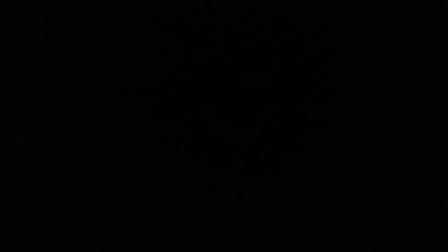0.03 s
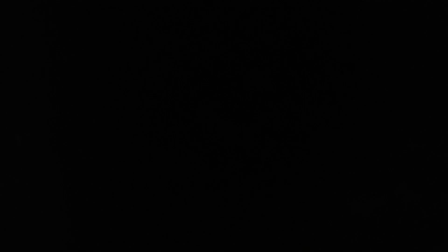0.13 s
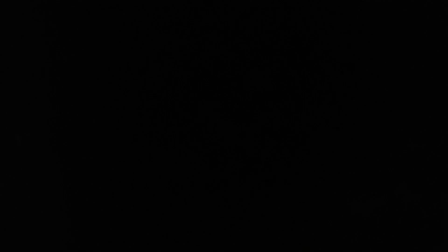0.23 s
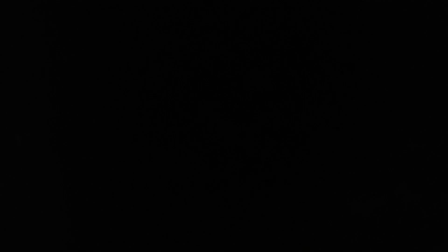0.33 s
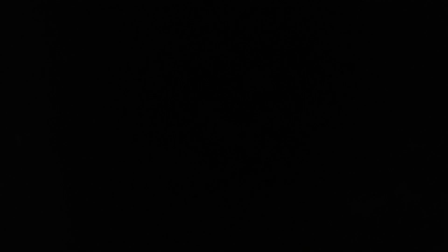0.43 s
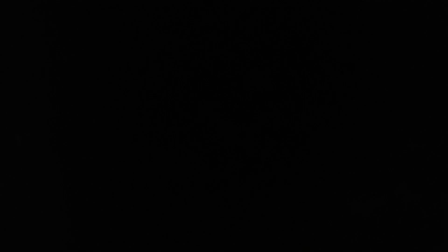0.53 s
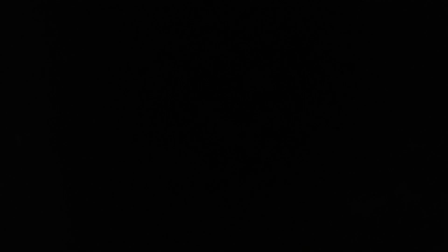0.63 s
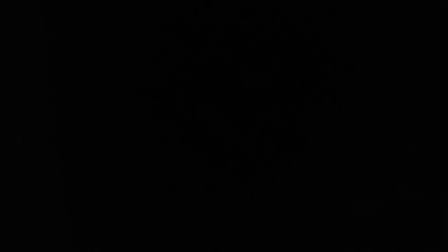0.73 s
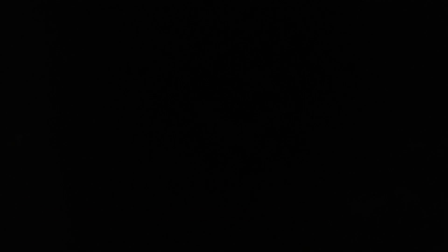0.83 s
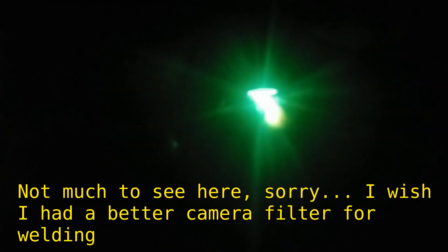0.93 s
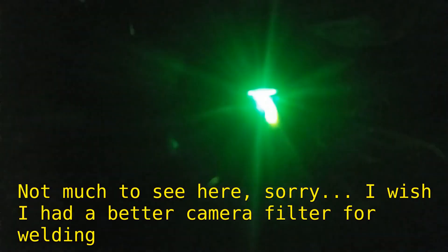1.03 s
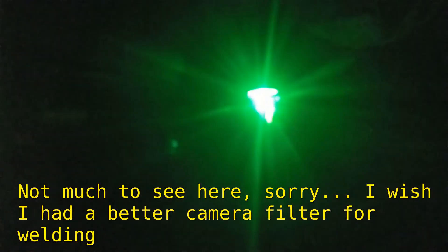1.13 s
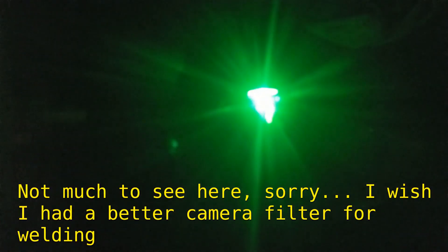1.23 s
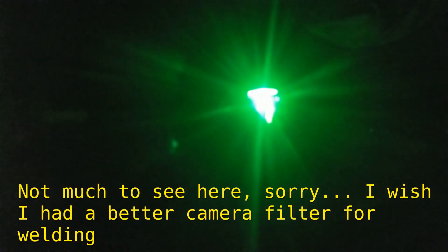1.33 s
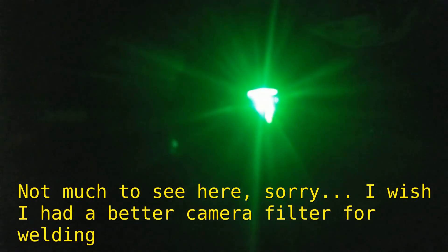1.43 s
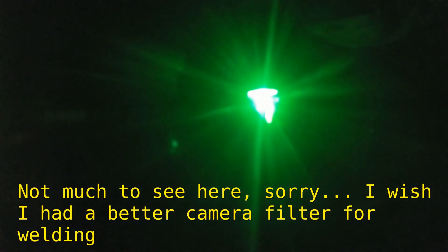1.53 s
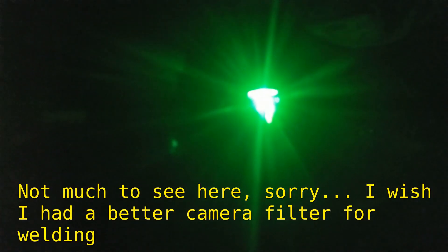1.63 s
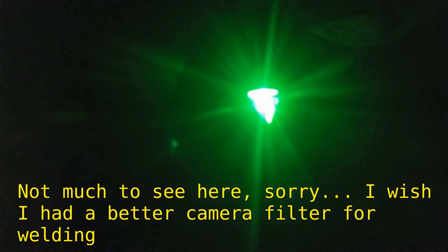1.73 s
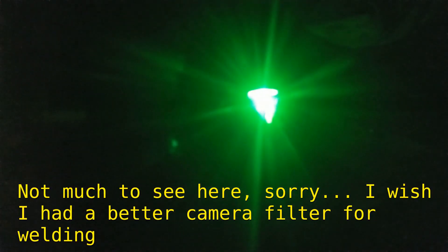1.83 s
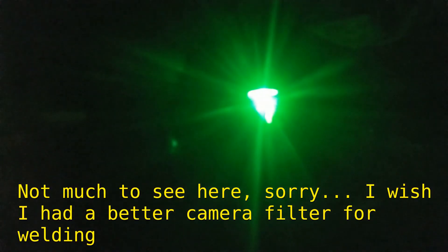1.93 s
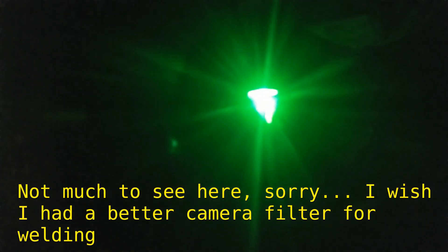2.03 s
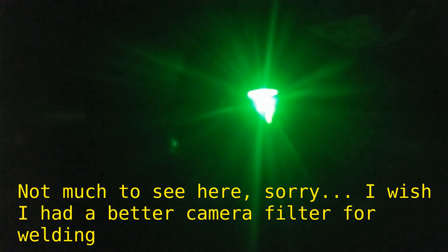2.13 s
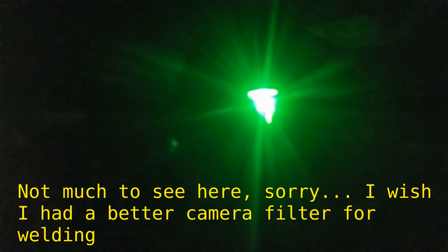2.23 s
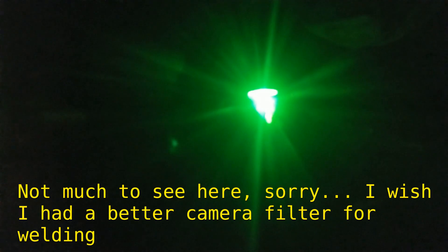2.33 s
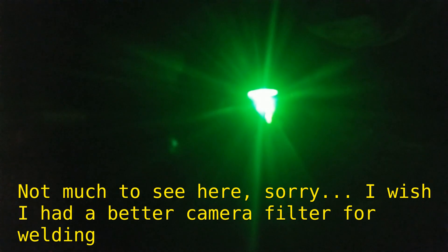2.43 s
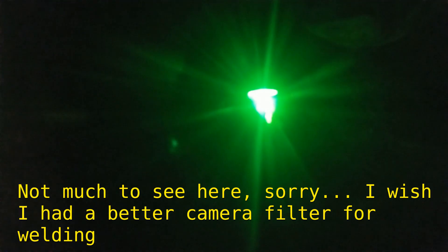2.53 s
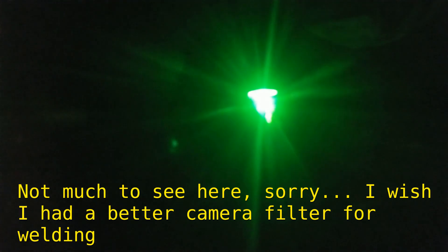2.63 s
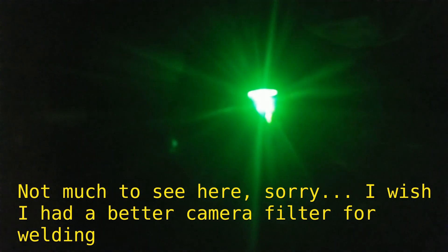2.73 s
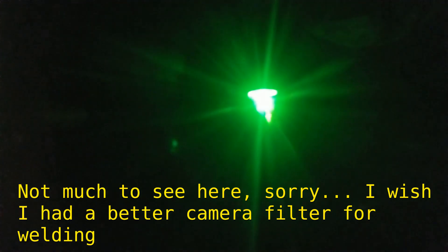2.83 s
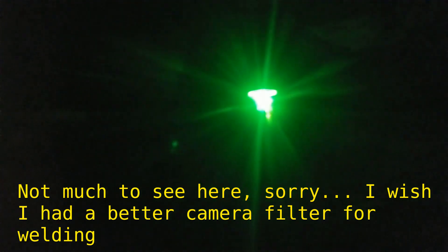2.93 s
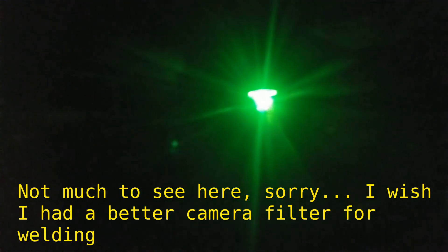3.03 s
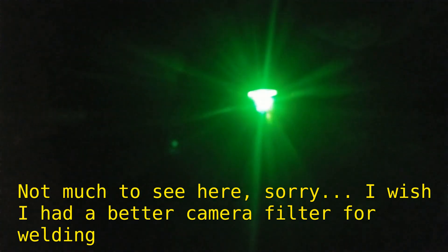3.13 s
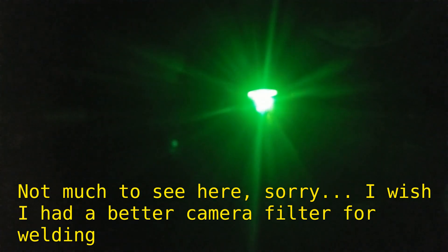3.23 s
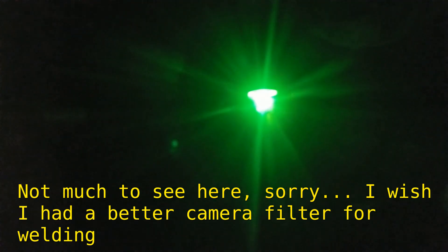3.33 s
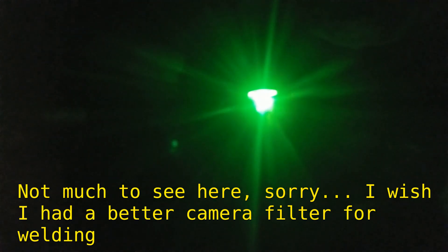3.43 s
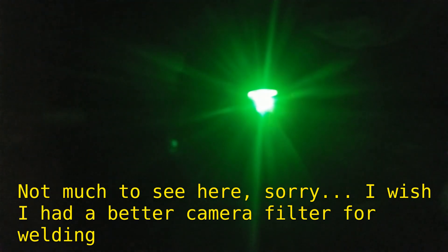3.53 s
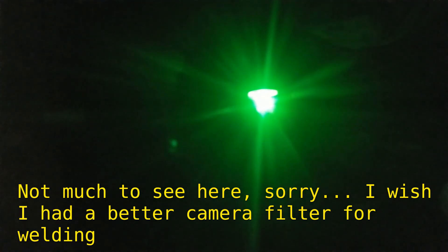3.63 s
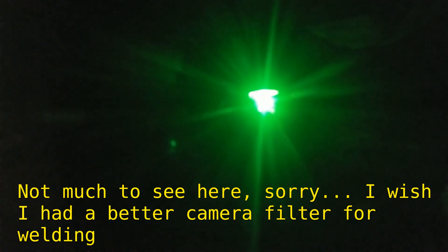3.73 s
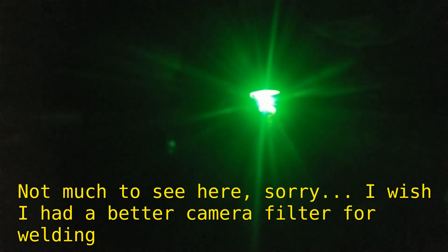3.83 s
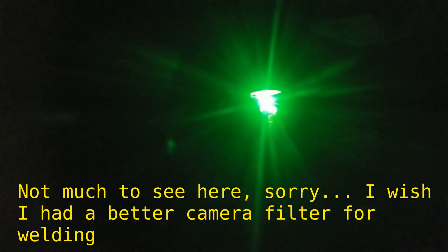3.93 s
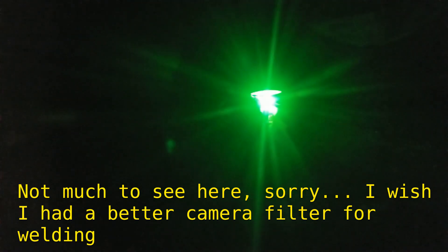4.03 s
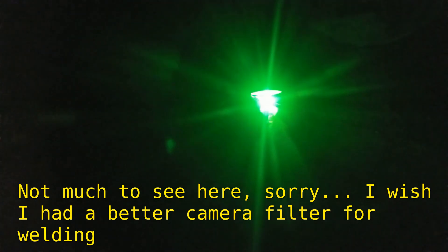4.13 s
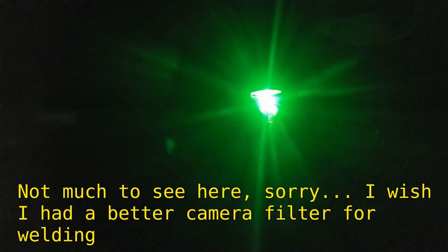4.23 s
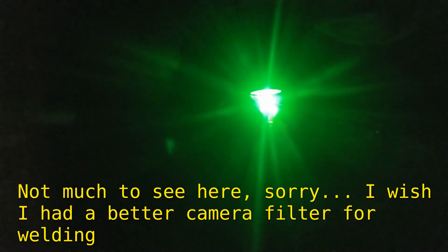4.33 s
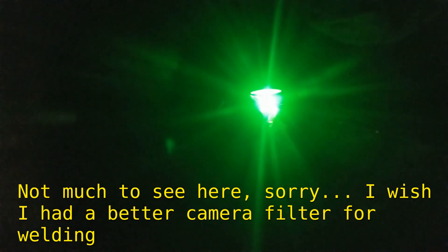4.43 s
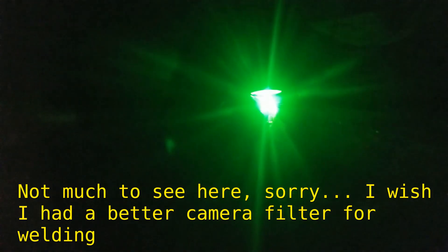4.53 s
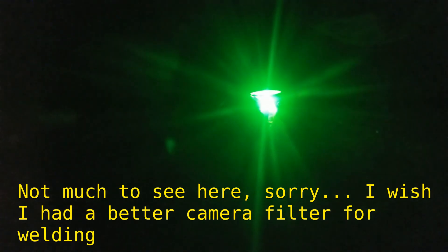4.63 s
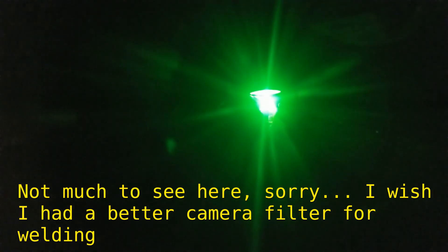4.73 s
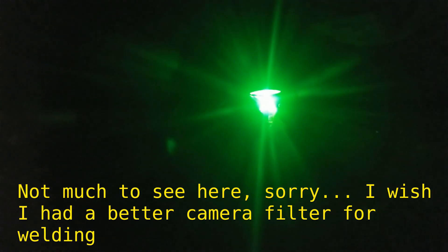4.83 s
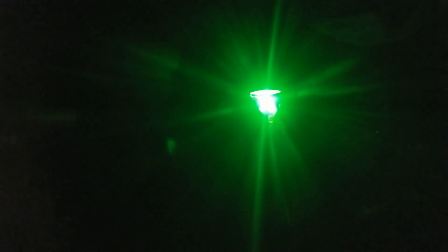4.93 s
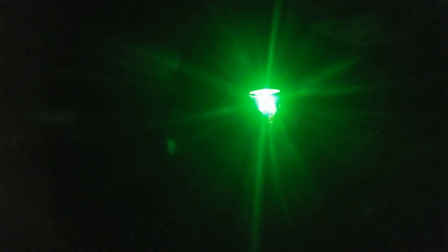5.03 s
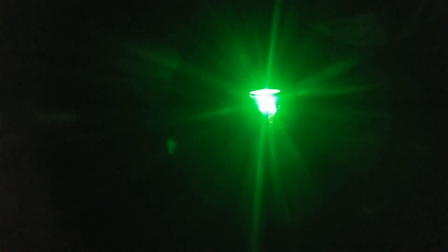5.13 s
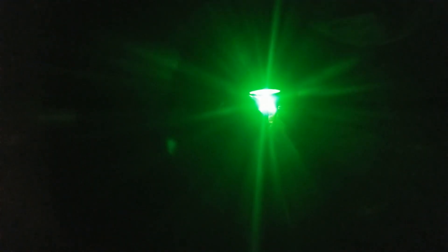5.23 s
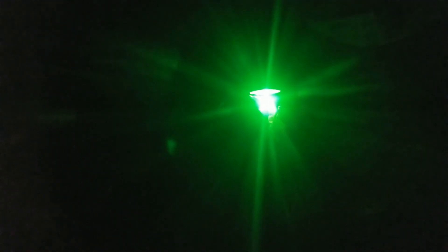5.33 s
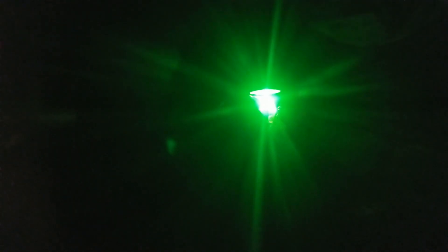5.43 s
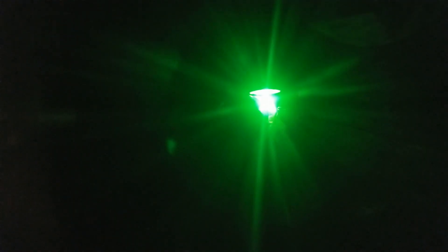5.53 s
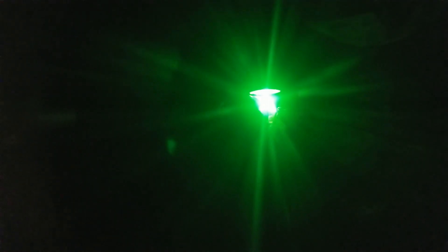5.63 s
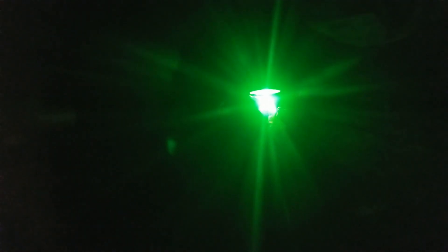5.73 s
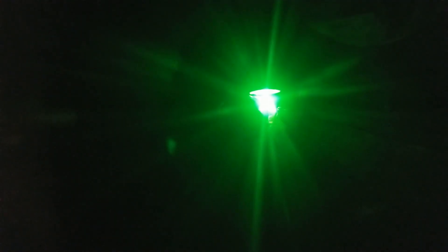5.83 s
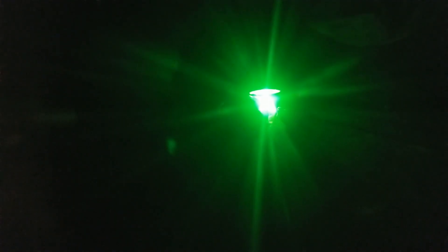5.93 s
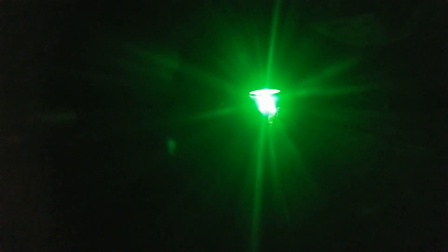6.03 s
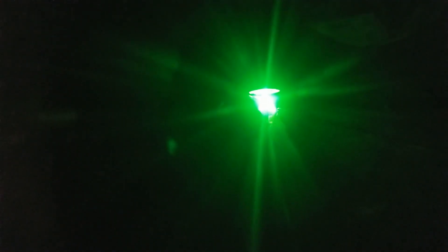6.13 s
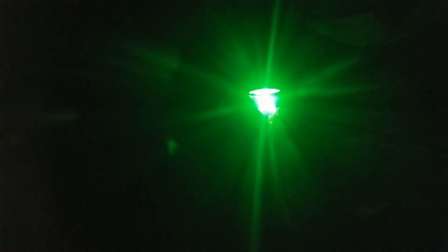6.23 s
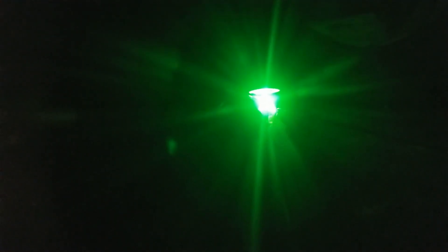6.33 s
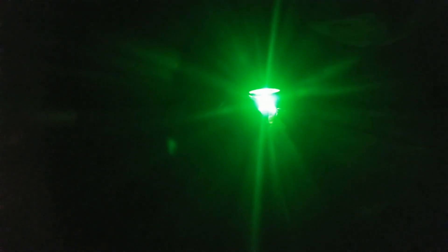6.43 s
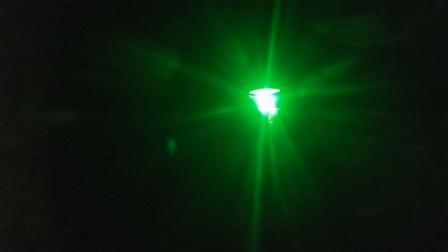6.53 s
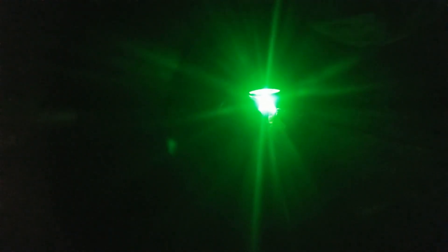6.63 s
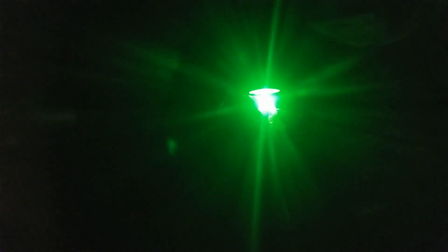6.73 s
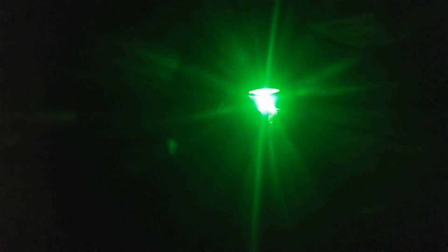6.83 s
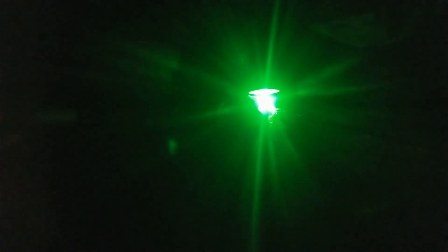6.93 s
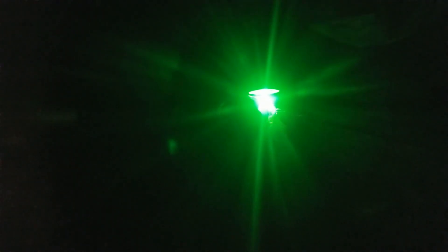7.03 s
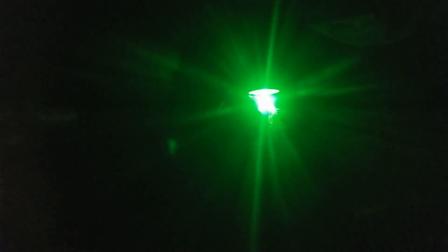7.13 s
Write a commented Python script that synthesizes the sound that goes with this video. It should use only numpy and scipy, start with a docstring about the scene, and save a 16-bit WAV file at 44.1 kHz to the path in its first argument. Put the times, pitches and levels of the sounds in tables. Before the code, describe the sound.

Close arc welding: a valve clack, a sharp crack and thump, then crackling molten metal giving way to a thin, steady hiss.

```python
"""TIG welding up close

A welder's fan hums near a small stereo camera. The gas valve clacks and argon spurts out.
The arc strikes with a crack and a puff of gas that makes the camera turn its volume down.
Dirty metal boils and sputters, then the arc settles to a high hiss with thin whistles,
throbbing with the mains power, while the volume creeps most of the way back."""
import sys
import numpy as np
from scipy import signal
from scipy.fft import rfft, irfft, next_fast_len
from scipy.io import wavfile
from scipy.ndimage import minimum_filter1d

SR = 44100
rng = np.random.default_rng(int(sys.argv[2]) if len(sys.argv) > 2 else 0)


def store_wav(level_fs):
    """Save 16-bit WAV to argv[1]."""
    pcm = np.round(np.clip(np.atleast_2d(level_fs), -1, 1) * 32767)
    wavfile.write(sys.argv[1], SR, pcm.T.astype(np.int16))


N = 316197
TIME = np.arange(N) / SR
VALVE_S, STRIKE_S = .6548, .924  # the gas starts, the arc lights

# How strong each sound is from bass to treble: pitch_hz, level_db
FAN_COLOUR = [(30, -43), (100, -17), (155, -10), (215, -1), (300, -1), (370, 4), (415, 1), (465, 3.5),
              (540, -11), (720, -3.5), (950, -12.5), (1350, -12.5), (4000, -24), (10000, -37),
              (12500, -34.5), (15500, -39)]
GAS_COLOUR = [(400, -22), (900, -15.5), (2000, -10.5), (2700, -14), (3200, -9), (4300, -20), (5500, -7.5),
              (7000, -1.5), (8300, -4.5), (9500, -17), (10800, -7), (11900, -1), (13000, 2), (14200, -1),
              (15600, 4)]
KNOCK_COLOUR = [(60, -14), (400, -3), (1000, 3.5), (2200, 2.5), (4000, -13), (6500, -10), (9500, -23),
                (15000, -12)]
SPIT_COLOUR = [(200, -24), (900, 4.5), (2200, -3), (4200, -11.5), (6300, 3.5), (9000, -3), (12500, 10.5),
               (15500, 1)]
SPUTTER_COLOUR = [(120, -42), (400, -10.5), (800, -1), (1400, 1), (2100, 2.5), (2680, -10), (2980, -1),
                  (3400, -6.5), (4200, -13.5), (5300, 1), (6500, 4.5), (7500, -1.5), (8100, -1.5),
                  (8850, -6), (9800, -6), (12000, 7), (15500, -3.5)]
LONG_ARC_COLOUR = [(1000, -49), (4400, -33), (5400, -13.5), (6800, -4), (8000, -33.5), (9000, -11),
                   (10200, 0.5), (11200, -5), (12100, 6.5), (12750, 5.5), (13500, -3), (14350, 1),
                   (14900, 4.5), (15800, 3.5)]
SHORT_ARC_COLOUR = [(1000, -24.5), (4700, -29.5), (5300, -18.5), (6500, -18.5), (8400, -9.5), (9600, -14.5),
                    (10400, -20), (11200, -1), (11750, -9.5), (12300, -1), (13400, 0), (14000, -2),
                    (14600, 0), (15800, -16)]
# The left microphone faces away, which changes what it hears: pitch_hz, gain_db
LEFT_MIC_COLOUR = [(100, 5), (380, -1), (550, 3), (800, -5.5), (1300, -5), (1800, -5), (2700, -3.5),
                   (3400, -4.5), (4300, -3), (6300, -2.5), (7600, -14), (9000, -14.5), (10000, -6),
                   (12300, -15), (13700, -10.5), (15000, -6.5)]
# Fan tones: pitch_hz, width_hz, level_db, left_minus_right_db
FAN_TONES = [(638.3, 1, -13.5, 1), (458, 12, -17, -2), (372.3, 2, -17, 8), (742, 8, -25, 0),
             (1042, 8, -27, 0), (2089, 5, -30, 0)]
# Two close tones of the fan case that beat together: pitch_hz, width_hz, level_db
CASE_DRONE = [(215.3, 6, -12), (231, 6, -14)]
# One swell of that drone: centre_s, half_width_s, gain_db
DRONE_SWELL = (0.3, 0.2, 5.6)
# Gusts of air on the microphones: centre_s, half_width_s, level_db
GUSTS = [(.06, 0.053, -57), (3.79, 0.18, -53.5)]
# Valve clack and arc strike: start_s, click_db, click_decay_s, rattle_db, rattle_decay_s
KNOCKS = [(0.6652, -9, 0.0016, -16, 0.0013), (0.9273, -8, 0.00022, -25, 0.032)]
# Gas pushed against the right microphone: start_s, level_db, rise_s, decay_s
PUFFS = [(0.6651, -34, 0.0004, 0.005), (0.935, 2.5, 0.0016, 0.0085), (2.264, -11.5, 0.00028, 0.0037)]
# Specks bursting from the pool of melted metal: start_s, level_db
SPITS = [(0.9275, -9), (0.9345, -15), (0.9358, -5), (0.9508, -2), (1.092, 4), (1.113, -10), (1.139, -11),
         (1.16, -4), (1.2131, -3), (1.56, 10), (1.5672, -2), (1.574, 4.5), (1.589, -4), (1.658, -4),
         (1.793, -3), (2.765, 3.5), (3.0565, -4), (3.326, -5)]
# Short, rough spurts of the pool: start_s, level_db, decay_s
SPURTS = [(1.069, -22, .005), (1.082, -23, 0.0027), (1.099, -25, 0.0017), (1.113, -20, 0.0017),
          (1.125, -18, 0.0029), (1.137, -28, 0.0021), (1.16, -19, 0.0016), (1.17, -13, 0.0023),
          (1.18, -12, 0.0024), (1.216, -22, .002), (1.242, -32, 0.0076), (1.257, -20, .002),
          (1.441, -23.5, 0.0033), (1.451, -23.5, 0.0022), (1.72, -32, 0.043), (2.021, -37, 0.082),
          (2.37, -29.5, 0.032), (2.826, -20, 0.0027), (2.839, -26, 0.003), (3.646, -25, 0.0047),
          (3.024, -19, 0.0036), (5.188, -29, 0.0053), (5.926, -32.5, 0.0092), (5.943, -31, 0.002),
          (6.043, -22.5, 0.0017), (6.299, -29, 0.004), (6.311, -24, 0.0023), (6.444, -30, 0.004),
          (6.459, -26.5, 0.0024), (6.743, -36, 0.005), (6.7564, -34, 0.003), (6.7852, -38, 0.0028),
          (6.7986, -20.5, 0.0031), (6.8753, -28, 0.0034), (7.001, -37, 0.0036), (7.0371, -34.5, 0.002),
          (7.059, -29, 0.0026), (7.1, -30, 0.0054), (7.147, -28, 0.0031)]
# The pool meets dirt and boils: start_s, length_s, level_db, growth_db_per_s, attack_s, treble_db
BOILING_FITS = [(0.964, 0.19, -26.5, -12, 0.019, 1), (1.198, 0.011, -16, -57, 0.003, -3.5),
                (1.547, 0.05, -30, -60, .005, 6.5), (1.609, 0.15, -30.5, 22, 0.0084, 5),
                (1.746, 0.35, -30, 20.5, 0.012, 0), (2.105, 0.091, -25, 6, 0.013, -13),
                (2.205, 0.21, -26.5, 28, 0.0099, -0.5), (2.423, 0.12, -23, 8, 0.008, -0.5),
                (2.539, 0.16, -21.5, 11, .012, 4), (2.706, .055, -21.5, -40, 0.0087, 3.5),
                (2.789, 0.029, -32, 0, .012, 3), (2.9, 0.16, -23.5, -63, 0.006, 6),
                (6.263, 0.072, -39.5, 1, 0.0096, 0), (6.74, 0.12, -35.5, -33, .004, 4),
                (6.899, 0.24, -38, 41, .004, -1)]
# The torch comes down to the pool (0 is far, 1 is near): time_s, closeness
TORCH_PATH = [(1, 0.04), (2.8, 0.1), (3.3, 0.62), (3.9, 0.79), (4.6, 0.7), (7.1, 0.94)]
# The hiss swells as the hand wavers: centre_s, half_width_s, gain_db
HISS_SWELLS = [(1.85, 0.35, 2.5), (2.7, 0.29, 1.5), (3.95, 0.29, 3), (4.17, 0.052, 2), (4.61, 0.048, 2),
               (4.76, 0.019, 1.5), (6.6, 0.89, 1), (7.028, 0.065, 2.5)]
# Whistles of the arc: pitch_hz, width_hz, level_db, loudest_at_closeness, throb_depth
WHISTLES = [(12649, 14, -7.3, 0, 0), (13770, 6, -22, 0, 0), (14880, 28, -16, 0, 0), (12285, 45, -11, 1, 0),
            (12428, 40, -6, 1, .4), (13719.5, 1.5, -8.8, 1, 1.6), (15015, 24, -20, .9, 0)]


def undb(db):
    """Turn decibels into a number to multiply by."""
    return 10 ** (np.asarray(db) / 20)


def unit(x):
    """Scale a signal to an average power of 1."""
    return x / np.sqrt(np.mean(x ** 2))


def cut(x, order, hz, kind="lowpass"):
    """Keep what is below hz (lowpass) or above it (highpass)."""
    return signal.sosfilt(signal.butter(order, hz, kind, fs=SR, output="sos"), x)


def log_gain(points, size):
    """Join (pitch_hz, level_db) points into a curve of natural-log gains."""
    hz, db = np.transpose(points)
    bins = np.maximum(np.fft.rfftfreq(size, 1 / SR), 1)
    return np.log(undb(np.interp(np.log(bins), np.log(hz), db)))


def colour(x, points, size=2048):
    """Shape a sound's bass and treble with a filter that rings only after each hit."""
    cepstrum = irfft(log_gain(points, size))
    cepstrum[1:size // 2] *= 2
    cepstrum[size // 2 + 1:] = 0
    response = irfft(np.exp(rfft(cepstrum)))
    return signal.fftconvolve(x, response / np.linalg.norm(response))[:N]


def wander(rate_hz):
    """A smooth random wobble, about 1 in size."""
    size = next_fast_len(N)
    bins = np.fft.rfftfreq(size, 1 / SR)
    spectrum = rfft(rng.standard_normal(size)) / (1 + (bins / rate_hz) ** 4)
    return unit(irfft(spectrum, size)[:N])


def tone(hz, width_hz):
    """A tone that drifts at random; more width makes it less pure."""
    drift = np.cumsum(rng.standard_normal(N)) * np.sqrt(2 * np.pi * width_hz / SR)
    return np.sqrt(2) * np.sin(2 * np.pi * hz * TIME + drift)


def hold(until_s, decay_s):
    """Stay at 1, then die away."""
    return np.exp(-np.maximum(TIME - until_s, 0) / decay_s)


def fade(start_s, decay_s):
    """Start suddenly, then die away."""
    return (TIME >= start_s) * hold(start_s, decay_s)


def bump(centre_s, half_width_s):
    """Rise and fall smoothly around a moment."""
    return np.exp(-((TIME - centre_s) / half_width_s) ** 2)


def crackle(per_s, scatter_db):
    """Tiny clicks of random size at random moments."""
    clicks = (rng.random(N) < per_s / SR) * np.sign(rng.standard_normal(N))
    return unit(clicks * undb(scatter_db * np.clip(rng.standard_normal(N), -2, 2)))


def draught():
    """Gusts of air rumble softly on the microphones."""
    gusts = sum(undb(db) * bump(s, width) for s, width, db in GUSTS)
    return colour(rng.standard_normal(N), [(30, -9), (70, -5), (130, 1), (220, -2), (600, -29)]) * gusts


def fan(stereo_width=0.76, level_db=-44):
    """Air rumbles through the welder's case, with steady tones and a throbbing drone."""
    def air():
        return colour(rng.standard_normal(N), FAN_COLOUR) * undb(0.45 * wander(27))
    sides = np.array([[.5], [-.5]])
    tones = sum(undb(db + pan * sides) * tone(hz, width) for hz, width, db, pan in FAN_TONES)
    swell_s, swell_width, swell_db = DRONE_SWELL
    drone = sum(undb(db) * tone(hz, width) for hz, width, db in CASE_DRONE)
    drone *= undb(swell_db * bump(swell_s, swell_width))
    spread = cut(air(), 4, 245, "highpass")  # long, low waves reach both sides alike
    return (undb(-1.5) * air() + 2 * sides * stereo_width * spread + tones + drone) * undb(level_db)


def workshop_echo(x, ring_s=0.1):
    """Sound bounces off bench and walls; the pattern shifts as the hand moves the torch."""
    age = TIME[:SR // 6]
    pose = 2 * wander(2.24)
    shares = np.array([np.cos(pose), np.sin(pose), np.cos(2 * pose), np.sin(2 * pose)]) / np.sqrt(2)
    echo = 0
    for share in shares:
        tail = rng.standard_normal(len(age)) * np.exp(-np.log(1000) * age / ring_s) * (age > .001)
        echo += signal.oaconvolve(x * share, tail / np.linalg.norm(tail))[:N]
    return colour(echo, [(300, -2.5), (2200, 11), (5000, 9), (13000, 5)])


def gas(nozzle_hz=11900, empty_s=0.38):
    """Argon stored in the hose spurts out and rings the nozzle; the first rush is brightest."""
    jet = colour(rng.standard_normal(N), GAS_COLOUR) + undb(-10) * tone(nozzle_hz, width_hz=350)
    rush = colour(rng.standard_normal(N), [(6000, -29.5), (10000, -16), (12800, -2), (15500, -4.5)])
    rush *= undb(-12) * hold(VALVE_S + 0.0073, decay_s=0.023)
    pressure = np.clip(1 - (TIME - VALVE_S) / empty_s, 0, 1)
    dull = cut(jet, 1, 6000)
    jet = dull + (jet - dull) * pressure ** .8  # a slower jet loses its treble first
    valve_open = (1 + np.tanh((TIME - VALVE_S) / .0007)) / 2
    return (jet * undb(-23.5) * pressure ** 1.14 + rush) * valve_open * undb(1.9 * wander(320))


def knocks():
    """The valve and the striking arc each give a sharp jump in pressure and a short rattle."""
    sound = 0
    for s, db, decay, rattle_db, rattle_decay in KNOCKS:
        pressure = fade(s, decay)
        click = colour(np.diff(pressure, prepend=0) + 0.28 * pressure, KNOCK_COLOUR)
        rattle = colour(rng.standard_normal(N) * fade(s, rattle_decay), KNOCK_COLOUR)
        sound += undb(db) * click / np.abs(click).max() + undb(rattle_db) * rattle
    return sound


def puffs():
    """Gas expands suddenly: the pressure rises fast and leaks away."""
    return sum(undb(db) * (1 + np.tanh((TIME - s) / rise / 2)) / 2 * hold(s, decay)
               for s, db, rise, decay in PUFFS)


def spits(decay_s=0.00022):
    """Single specks of metal burst."""
    bursts = sum(undb(db) * fade(s, decay_s) for s, db in SPITS) * rng.standard_normal(N)
    return undb(-4.5) * colour(bursts, SPIT_COLOUR)


def boiling_level(start_s, length_s, db, growth_db_per_s, attack_s):
    """One fit of boiling flares up, grows or shrinks while it lasts, and dies quickly."""
    age = np.maximum(TIME - start_s, 0)
    gate = (1 - np.exp(-age / attack_s)) * hold(start_s + length_s, decay_s=0.013)
    return gate * undb(db + growth_db_per_s * np.minimum(age, length_s))


def sputter(closeness, fits, clean_s=3.06):
    """Boiling metal crackles coarsely; a closer torch makes it choppier and duller."""
    pool = colour(crackle(per_s=2000, scatter_db=3.5), SPUTTER_COLOUR)
    pool *= undb((2 * closeness - 0.07) * wander(77) + 2 * wander(4.7))
    body = cut(pool, 1, 2900)
    simmer = undb(np.where(TIME < clean_s, -38, -49.5))  # quieter once the surface has burnt clean
    spurts = sum(undb(db) * fade(s, decay) for s, db, decay in SPURTS)
    body_level = np.hypot(simmer, fits.sum(axis=0)) + spurts
    fit_treble = undb([row[5] for row in BOILING_FITS]) @ fits
    treble_level = np.hypot(simmer, fit_treble) + undb(-12) * spurts
    return body * body_level + undb(-9 * closeness) * (pool - body) * treble_level


def plasma(closeness, throb_hz=120):
    """The arc's fine crackle makes a hiss; it and some of the whistles throb with the mains."""
    mains = closeness * np.cos(2 * np.pi * throb_hz * TIME)
    grains = crackle(per_s=8000, scatter_db=5.5) * (1 + 0.23 * mains) * undb(0.31 * wander(21))
    hiss = np.sqrt(1 - closeness) * colour(grains, LONG_ARC_COLOUR)
    hiss += np.sqrt(closeness) * colour(grains, SHORT_ARC_COLOUR)
    whistles = 0
    for hz, width, db, loudest_at, throb in WHISTLES:
        level = np.clip(1 - 0.7 * abs(closeness - loudest_at), 0, 1) * undb(db + .8 * wander(22))
        whistles += level * unit(tone(hz, width) * np.exp(throb * mains))
    steadied = 1 - fade(STRIKE_S, .25)  # whistles build up as the jet steadies
    return undb(-1.23) * hiss + whistles * steadied


def plasma_level(boiling, build_s=0.0046, fresh_db=9, settle_s=0.66):
    """A fresh arc is loud, then settles; it flares as the pool boils and swells as the hand wavers."""
    age = np.maximum(TIME - STRIKE_S, 0)
    settling = (1 - np.exp(-age / build_s)) * undb(-28 + fresh_db * np.exp(-age / settle_s))
    swell_db = sum(db * bump(s, width) for s, width, db in HISS_SWELLS)
    return np.hypot(settling, undb(-4) * boiling) * undb(swell_db)


def arc():
    """Once lit, the arc hisses and the metal it melts sputters and spits."""
    closeness = np.clip(np.interp(TIME, *np.transpose(TORCH_PATH)), 0, 1)
    fits = np.array([boiling_level(*row[:5]) for row in BOILING_FITS])
    hiss = plasma(closeness) * plasma_level(fits.sum(axis=0))
    return (hiss + sputter(closeness, fits)) * (TIME > STRIKE_S) + spits()


def left_mic(x, notch_hz=8800):
    """Sound bends round the camera: one pitch drops out, and waves above it turn upside down."""
    size = next_fast_len(N + SR // 10)
    flip = np.tanh((notch_hz - np.fft.rfftfreq(size, 1 / SR)) / 300)
    return irfft(rfft(x, size) * np.exp(log_gain(LEFT_MIC_COLOUR, size)) * flip, size)[:N]


def scene():
    """The torch is close on the right; the left microphone hears more of the room."""
    torch = gas() + knocks() + arc()
    air = fan() + draught()
    left = left_mic(undb(-4) * torch + undb(-2.5) * workshop_echo(torch) + air[0])
    right = undb(-1.69) * torch + undb(-12) * workshop_echo(torch) + air[1] + puffs()
    return np.array([left, right])


def auto_volume(x, limit_db=-16.5, hold_s=1.36, release_s=1.0, attack_s=0.059, kept=0.12):
    """Too much bass on the right turns the volume down; it waits, then creeps most of the way back."""
    bass = cut(x[1], 2, 120)
    over_db = np.maximum(20 * np.log10(np.abs(bass) + 1e-9) - limit_db, 0)
    window = int(hold_s * SR)
    held_db = -minimum_filter1d(-over_db, window, origin=(window - 1) // 2, mode="constant")
    release = np.exp(-TIME / release_s)
    easing_db = np.maximum.accumulate(held_db / release) * release
    cut_db = (1 - kept) * easing_db + kept * np.maximum.accumulate(held_db)
    step = 1 / (attack_s * SR)
    return x * undb(-signal.lfilter([step], [1, step - 1], cut_db))


def record(dry, rumble_hz=42, top_hz=15750):
    """The camera sets its volume, cuts rumble (so puffs become thumps) and drops the top treble."""
    sound = cut(auto_volume(dry), 3, rumble_hz, "highpass")
    return signal.sosfilt(signal.ellip(10, .2, 70, top_hz, fs=SR, output="sos"), sound)


dry = scene()
out = record(dry)
store_wav(out)
```